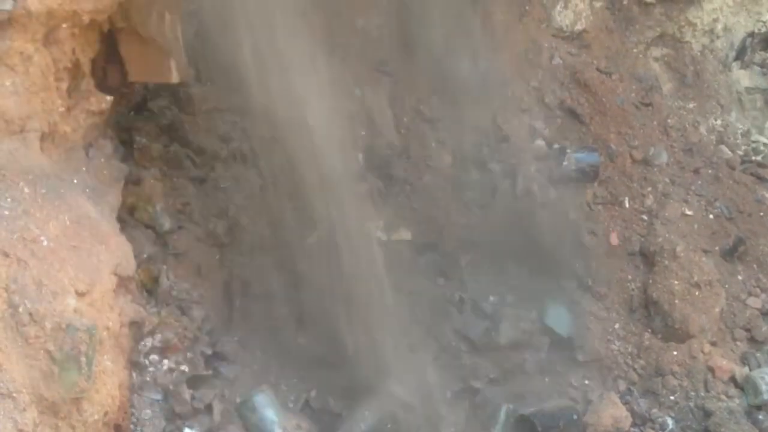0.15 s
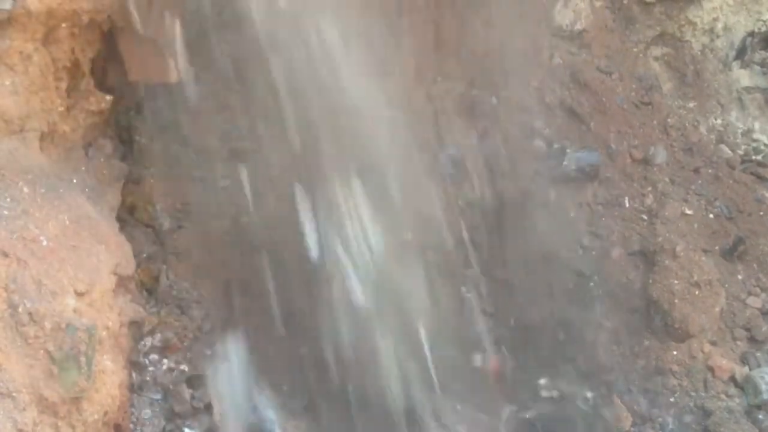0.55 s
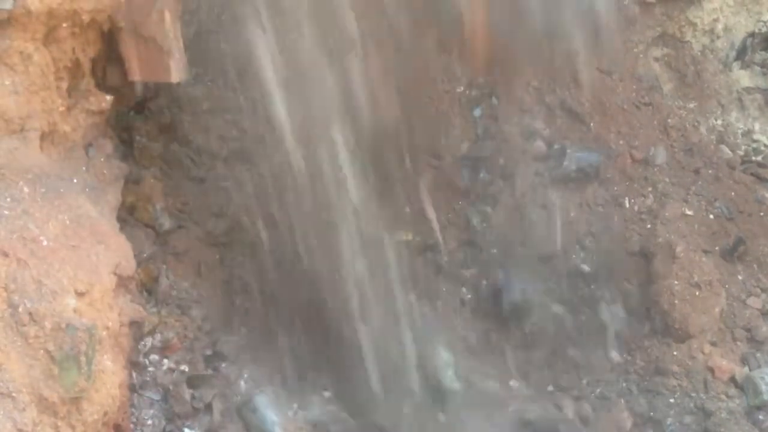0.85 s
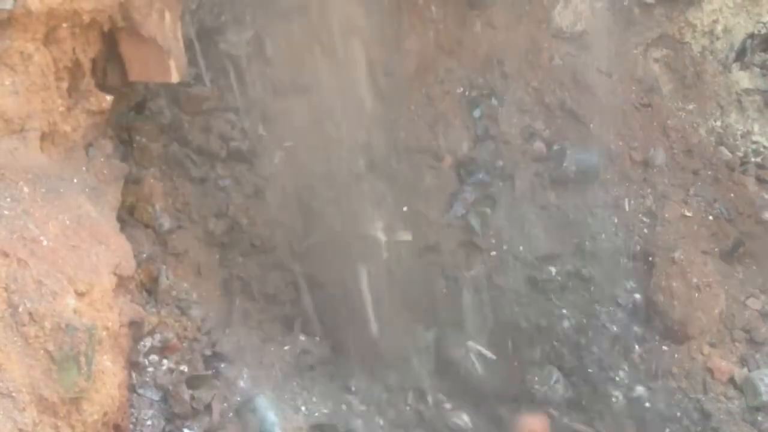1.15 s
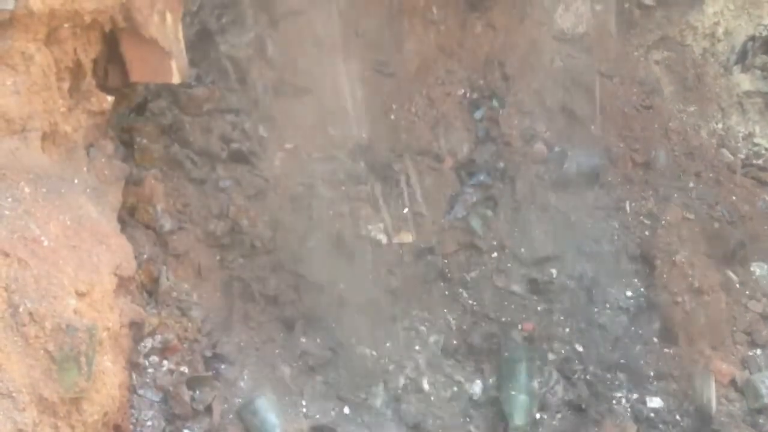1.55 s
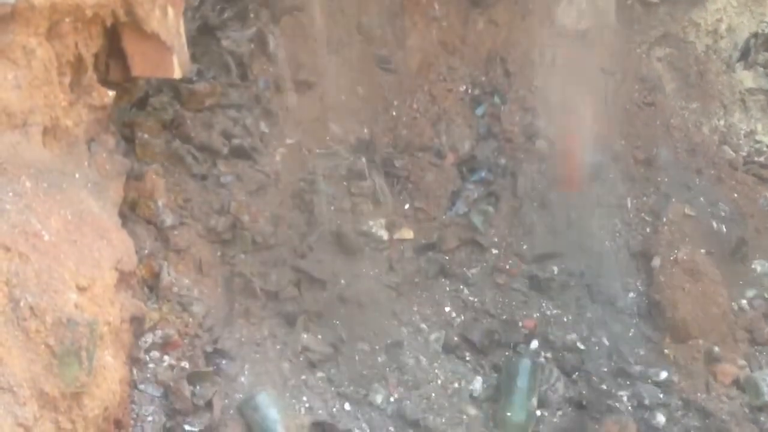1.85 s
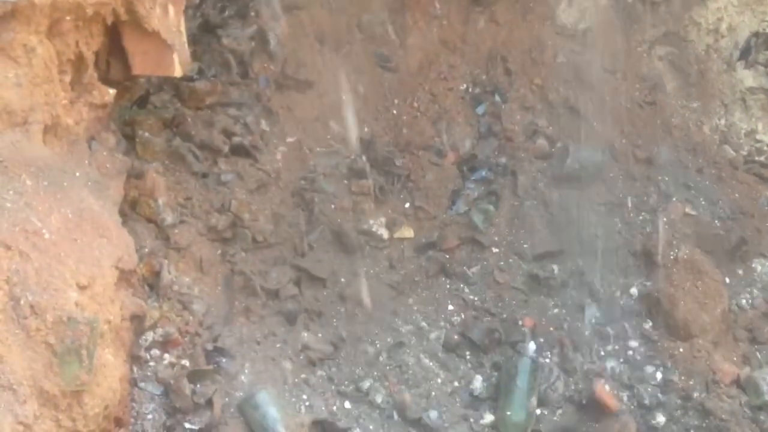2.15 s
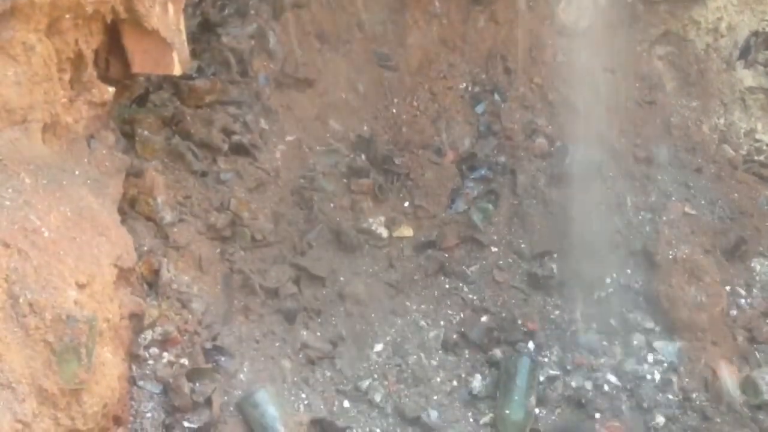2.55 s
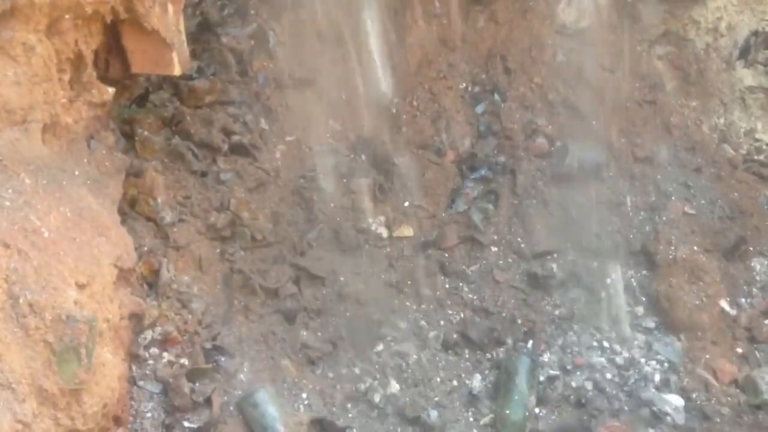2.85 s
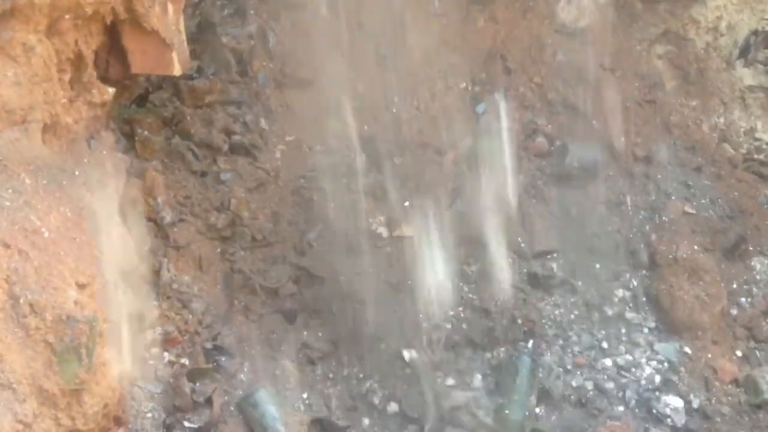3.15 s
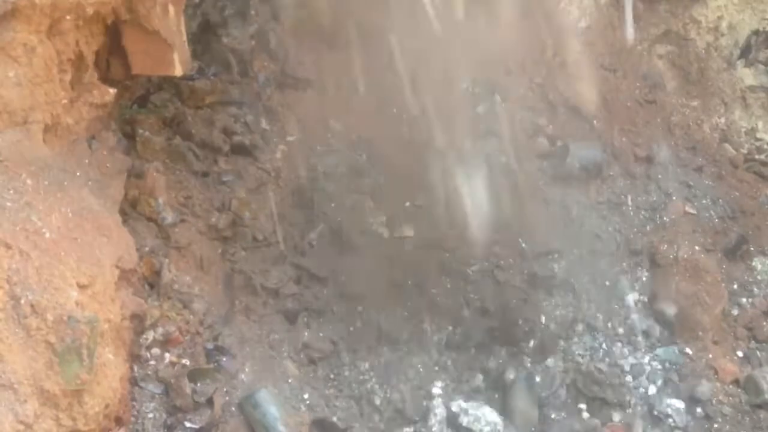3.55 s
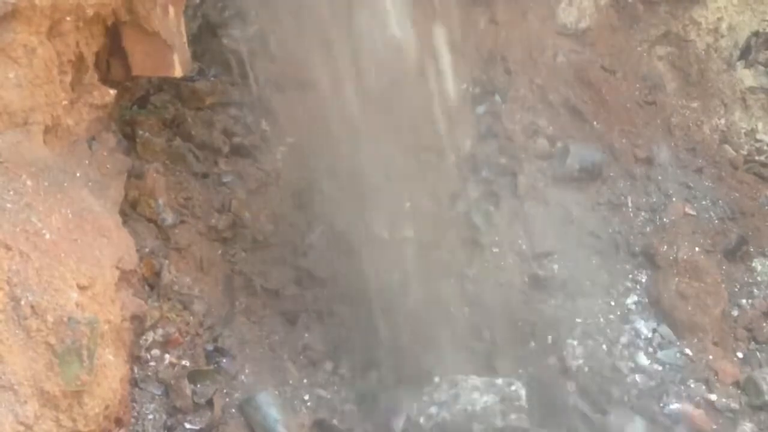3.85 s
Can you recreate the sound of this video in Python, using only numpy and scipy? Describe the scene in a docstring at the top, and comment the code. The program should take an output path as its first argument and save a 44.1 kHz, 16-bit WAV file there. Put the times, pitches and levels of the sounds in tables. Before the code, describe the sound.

Debris slides down a dirt face with bright glass clinks while an engine drones behind

```python
"""An earthen dig face: loose soil pours down, thins to a trickle and starts to build again.
The soil is many tiny noise bursts over hiss; stones and clods are larger bursts with short echoes.
Glass shards crack together and ring as fading pairs of tones, and hollow pieces give lower tones.
Behind, a digger's engine drones as a stack of tones with clatter; the drone drops abruptly at 2.5 s."""
import sys
import numpy as np
from scipy import signal
from scipy.fft import rfft, irfft
from scipy.io import wavfile

SR = 44100
rng = np.random.default_rng(int(sys.argv[2]) if len(sys.argv) > 2 else 0)


def store_wav(level_fs):
    """Save 16-bit WAV to argv[1]."""
    pcm = np.round(np.clip(np.atleast_2d(level_fs), -1, 1) * 32767)
    wavfile.write(sys.argv[1], SR, pcm.T.astype(np.int16))


N = 176400
T = np.arange(N) / SR

# Flow of the pouring soil: t/s, earth level/dB, gravel level/dB, sand level/dB
SOIL_FLOW = [(0, -24.5, -25, -25.5), (.1, -27.5, -26, -26.5), (.2, -34.5, -31.5, -33),
             (.3, -36.5, -38.5, -35.5), (.42, -31.5, -33.5, -31.5), (.55, -32, -26, -27.5),
             (.64, -41.5, -33.5, -27), (.73, -47.5, -44.5, -38.5), (.92, -39.5, -46.5, -35.5),
             (1.05, -49.5, -45.5, -34.5), (1.3, -47.5, -49.5, -41.5), (1.52, -48, -52.5, -44),
             (1.6, -43.5, -48, -44.5), (1.85, -47.5, -52, -45.5), (2.15, -41, -42, -45),
             (2.48, -54, -52, -42), (2.53, -55, -62, -50.5), (2.8, -53, -53, -47), (3.1, -46, -47, -41.5),
             (3.32, -45.5, -49.5, -45.5), (3.52, -50.5, -50.5, -48), (3.64, -42.5, -48.5, -43),
             (3.78, -39.5, -41.5, -39), (4, -45.5, -46, -40.5)]
HARD_RISE_S = 0.0002  # time constant of the sharp start of grains and cracks


def amp(db):
    """Turns decibels into a gain."""
    return 10 ** (np.asarray(db) / 20)


def unit(x):
    """Scales a sound to an rms level of 1."""
    return x / np.sqrt(np.mean(x ** 2) + 1e-20)


def curve(table):
    """Draws each column of a time table as a line through every sample."""
    seconds, *columns = np.transpose(table)
    return [np.interp(T, seconds, column) for column in columns]


def add(mix, start_s, sound):
    """Mixes a sound into a longer one from a given time."""
    part = mix[max(0, round(start_s * SR)):][:len(sound)]
    part += sound[:len(part)]


def colour(x, points, size=2048):
    """Shapes the spectrum with a filter of unit energy that never sounds ahead of its input."""
    hz, db = np.transpose(points)
    log_hz = np.log(abs(np.fft.fftfreq(size, 1 / SR)) + 1)
    log_gain = np.log(amp(np.interp(log_hz, np.log(hz), db)))
    # the Hilbert transform gives the phase that puts the energy as early as possible
    taps = np.fft.ifft(np.exp(np.conj(signal.hilbert(log_gain)))).real
    return signal.oaconvolve(x, taps / np.linalg.norm(taps))[:N]


def engine():
    """Exhaust tones follow the engine speed, with noisy clatter that throbs twice a cycle."""
    # engine speed: t/s, cycle rate/Hz
    speed = [(0, 14.7), (.5, 14.3), (.7, 14.7), (.9, 14.65), (1.27, 14.4), (1.45, 14.9), (1.75, 15.4),
             (1.95, 15.52), (2.45, 15.5), (2.8, 15.12), (3.15, 15.08), (3.55, 14.65), (3.75, 14.4),
             (4, 14.85)]
    # loudness of the drone: t/s, level/dB
    drone = [(0, -43), (.5, -38), (.8, -36), (1.3, -36), (1.8, -31), (2.49, -29.5), (2.505, -40.5),
             (3, -34.5), (3.4, -38), (4, -33)]
    # exhaust tones: multiple of the cycle rate, relative level/dB
    orders = [(9, -2.5), (10, -8.5), (11, -3.5), (12, 2.5), (14, -9), (15, -10), (20, -5.5), (24, -15.5),
              (25, -17.5), (31, -17.5), (35, -19.5), (40, -11)]
    # spectrum of the clatter: f/Hz, relative level/dB per Hz
    clatter_spectrum = [(20, 5), (85, -8), (140, 0.5), (260, -8), (330, 7), (420, -4), (620, -9),
                        (850, -10), (1200, -14.5), (2500, -22), (6000, -34), (16000, -25)]
    clatter_db, throb_depth, phase_scatter_rad = -11, 0.25, 1

    turn = 2 * np.pi * np.cumsum(curve(speed)[0]) / SR
    tones = np.zeros(N)
    for multiple, db in orders:
        phase = phase_scatter_rad * rng.standard_normal()
        tones += amp(db) * np.cos(multiple * turn + phase)
    throbbing = rng.standard_normal(N) * (1 + throb_depth * np.cos(2 * turn))
    clatter = unit(colour(throbbing, clatter_spectrum))
    return amp(curve(drone)[0]) * (unit(tones) + amp(clatter_db) * clatter)


def pit(x, size=8000):
    """The earth walls return a short, fading scatter of echoes."""
    echo_db, echo_t60_s, echoes_per_s, first_echo_s = -14.5, 0.05, 2000, 0.004
    t = np.arange(size) / SR
    present = (rng.random(size) < echoes_per_s / SR) * (t > first_echo_s)
    taps = rng.standard_normal(size) * present * amp(-60 * t / echo_t60_s)
    return x + amp(echo_db) * signal.oaconvolve(x, taps / np.linalg.norm(taps))[:N]


def flutter(hz, size):
    """Slowed-down noise makes the loudness unsteady, as a piece rattles on the soil."""
    depth = 0.4
    slow_noise = signal.lfilter(*signal.butter(1, hz, fs=SR), rng.standard_normal(size))
    return 1 + depth * unit(slow_noise)


def hollow(hz, db, t60, size=12000):
    """One low resonance swells and dies away unsteadily."""
    rise_s, rattle_hz = 0.0027, 60
    t = np.arange(size) / SR
    ring = flutter(rattle_hz, size) * np.sin(2 * np.pi * (hz * t + rng.random()))
    return ring * (1 - np.exp(-t / rise_s)) * amp(db - 60 * t / t60)


def clink(hz, db, over_hz, over_db, t60, size=9000):
    """A shard ticks on contact and rings in two modes, fluttering as it rattles on the soil."""
    rise_s, rattle_hz, tick_db, tick_t60_s = 0.00066, 252, -11, 0.028
    t = np.arange(size) / SR
    ring = np.zeros(size)
    for mode_hz, mode_db in [(hz, db), (over_hz, over_db)]:
        ring += amp(mode_db) * flutter(rattle_hz, size) * np.sin(2 * np.pi * mode_hz * t)
    # the tick is noise without its lows
    tick = signal.lfilter(*signal.butter(2, hz / 2, "high", fs=SR), rng.standard_normal(size))
    tick *= amp(db + tick_db - 60 * t / tick_t60_s)
    return tick + ring * (1 - np.exp(-t / rise_s)) * amp(-60 * t / t60)


def splinters(size=5000, count=4):
    """Bunches of glass bits tick and tinkle in the sand, crowded in the rush, rare in the trickle."""
    tries_per_s, bit_db, bit_t60_s = 45, -7, 0.05  # the bit level is relative to the sand
    extra_db, hop_s = 11, 0.012  # most added to a bit's level, and spacing of the bits
    lowest_hz, span_hz = 6370, 8000
    out, sand_db = np.zeros(N), curve(SOIL_FLOW)[2]
    for when, chance, *bits in rng.random((int(tries_per_s * N / SR), 2 + 4 * count)):
        flow_db = sand_db[int(when * N)]
        # a weaker flow lets fewer bunches through
        if chance ** 2 > amp(flow_db - sand_db.max()):
            continue
        for k, (hop, pitch, overtone, weight) in enumerate(np.reshape(bits, (count, -1))):
            level = flow_db + bit_db + extra_db * weight ** 3
            low_hz, high_hz = lowest_hz + span_hz * np.sort([pitch ** 2, overtone])
            bit = clink(low_hz, level, high_hz, level - 2.5, bit_t60_s, size=size)
            add(out, when * N / SR + hop_s * (k + hop), bit)
    return out


def blow(db, hz, octaves, t60, rise_s, size=6000):
    """A short burst of noise around a centre pitch stands for many brief resonances."""
    t, f = np.arange(size) / SR, np.fft.rfftfreq(size, 1 / SR) + 1
    # a hump on the pitch scale, leaning towards the lows
    shape = np.exp(-.5 * (np.log2(f / hz) / octaves) ** 2) / np.sqrt(1 + f / hz)
    body = unit(irfft(rfft(rng.standard_normal(size)) * shape))
    return .5 * body * (1 - np.exp(-t / rise_s)) * amp(db - 60 * t / t60)


def clod(db, hz, t60, size=9000):
    """A soft thud sets the heap ringing, a little differently each time."""
    # hollow ring of the heap: f/Hz before detuning, level/dB relative to the clod, t60/s
    heap = [(281, -9, 0.063), (546, -6, 0.059), (796, -13, 0.081), (1216, -15.5, 0.16), (1583, -32, 0.26)]
    width_octaves, rise_s, detune = 1, 0.0012, 0.03
    ring = np.zeros(size)
    for mode_hz, mode_db, decay_s in heap:
        detuned_hz = mode_hz * (1 + detune * rng.uniform(-0.85, 1))
        ring += hollow(detuned_hz, db + mode_db, decay_s, size=size)
    return blow(db, hz, width_octaves, t60, rise_s, size=size) + .5 * ring


def crack(db, hz, octaves, t60):
    """A hard piece strikes and at once strikes again, more softly, as it tips over."""
    rebound_s, rebound_db = 0.0031, -5
    sound = blow(db, hz, octaves, t60, HARD_RISE_S)
    add(sound, rebound_s, blow(db + rebound_db, hz, octaves, t60, HARD_RISE_S))
    return sound


def grains(rate, hz, spread_db, t60, wash_db, count=24):
    """Many small impacts at random times, of varied size and pitch, over a wash of finer dust."""
    width_octaves, scatter_octaves = 0.48, 1.324  # width of one grain, reach of the pitches each way
    sizes = amp(spread_db * np.minimum(rng.exponential(1, N), 3))
    hits = (rng.random(N) < rate / SR) * sizes
    kind = rng.integers(0, count, N)
    pitches = hz * 2 ** (scatter_octaves * np.linspace(-1, 1, count))
    out = np.zeros(N)
    for k, pitch in enumerate(pitches):
        grain = blow(0, pitch, width_octaves, t60, HARD_RISE_S, size=2048)
        out += signal.oaconvolve(hits * (kind == k), grain)[:N]
    return unit(out) + amp(wash_db) * rng.standard_normal(N)


def soil():
    """Earth thuds, gravel rattles and sand hisses as the flow swells and thins."""
    # filters for the three kinds of grain: f/Hz, relative level/dB
    earth_spectrum = [(20, -28), (90, -36), (150, 3), (260, -0.5), (400, -2.5), (660, 3), (830, -9.5),
                      (1000, -11.5), (2000, -26), (16000, -36)]
    gravel_spectrum = [(20, -59), (300, -47), (800, -1.5), (1300, -0.5), (1900, -3.5), (3100, 2),
                       (4400, -1), (7000, -19), (16000, -48)]
    sand_spectrum = [(20, -54), (1500, -14), (3800, -3), (5200, -2.5), (6700, 2.5), (8500, 1),
                     (11000, -5.5), (13000, 2), (15200, -4.5), (16000, -15)]
    earth_db, gravel_db, sand_db = curve(SOIL_FLOW)
    # rate is in impacts per second
    earth = grains(rate=350, hz=461, spread_db=3.5, t60=0.065, wash_db=-1.0)
    gravel = grains(rate=550, hz=2210, spread_db=4.5, t60=0.028, wash_db=-3)
    sand = grains(rate=700, hz=7500, spread_db=5.5, t60=0.017, wash_db=-3)
    return (amp(earth_db) * unit(colour(earth, earth_spectrum))
            + amp(gravel_db) * unit(colour(gravel, gravel_spectrum))
            + amp(sand_db) * unit(colour(sand, sand_spectrum)))


def scene():
    """Soil, glass and stones sound in the pit, with the engine behind."""
    # ringing shards: t/s, f/Hz, level/dB, overtone f/Hz, overtone level/dB, t60/s
    shards = [(0.113, 10228, -21, 6700, -35, 0.093), (.127, 6960, -20.5, 11700, -25, 0.25),
              (0.411, 7360, -22.5, 10430, -24, 0.3), (0.414, 7700, -23, 10300, -26, 0.12),
              (.443, 7230, -13, 12900, -16, 0.064), (0.445, 8500, -22, 6270, -23, 0.063),
              (.526, 5975, -14.5, 12900, -29, 0.08), (0.593, 8500, -23, 14900, -25, 0.093),
              (0.621, 6330, -8.5, 10800, -21, 0.05), (0.65, 6740, -5.5, 8600, -28, 0.053),
              (0.761, 6720, -15, 13340, -20.5, 0.089), (0.764, 7090, -21.5, 13100, -35, 0.21),
              (0.999, 10706, -18.5, 13200, -25, 0.12), (1.003, 6330, -19.5, 14600, -29, 0.1),
              (1.037, 6620, -13.5, 12860, -16, 0.045), (1.043, 6470, -17, 7180, -18, 0.056),
              (1.136, 6310, -12, 14000, -11, 0.03), (1.2209, 5420, -11, 6400, -28, 0.02),
              (1.285, 11300, -24, 7300, -26, 0.019), (1.631, 10664, -31.5, 14438, -35, 0.055),
              (1.952, 8730, -13.5, 13000, -25, 0.098), (2.06, 9400, -27.5, 13065, -30, 0.076),
              (2.287, 9290, -17.5, 13400, -24, 0.1), (2.403, 5490, -22, 8000, -34, 0.095),
              (2.423, 8000, -19.5, 12000, -26, 0.13), (2.471, 8100, -19, 13000, -16, 0.049),
              (2.521, 8060, -32.5, 12295, -36, 0.12), (2.656, 8700, -35, 8000, -40, 0.13),
              (2.952, 8400, -19, 12300, -38, 0.029), (3.037, 6390, -21, 10670, -30, 0.067),
              (3.1236, 8327, -23, 12478, -26, 0.046), (3.434, 5465, -18.5, 9576, -36, 0.058)]
    # sharp blows of stone and glass: t/s, relative level/dB, centre f/Hz, width/octaves, t60/s
    sharp_blows = [(.007, -16.5, 3470, 0.14, 0.17), (0.1645, -6, 2200, 1.6, 0.058),
                   (.204, -20, 4210, 0.27, 0.024), (.222, -11.5, 5650, 0.75, 0.028),
                   (.36, -6.5, 3500, 1.3, 0.032), (0.464, -11, 2570, 1.8, 0.048),
                   (0.4757, -9, 4000, 1.8, .007), (0.5092, -9, 2820, 0.44, 0.049),
                   (0.5623, -3.5, 3840, 0.34, 0.009), (0.593, -10.5, 10000, .7, 0.028),
                   (0.6214, -12, 4500, 4.5, 0.022), (0.659, -7.5, 6000, 2, 0.01),
                   (0.7057, -14, 7500, 0.63, 0.016), (0.762, -20, 9050, .7, 0.012),
                   (0.8059, -12.5, 5970, 0.87, 0.021), (1.039, -13.5, 4000, 2.5, 0.068),
                   (1.1366, -10.5, 4550, 2.2, 0.012), (1.1983, -12, 2900, 1.13, 0.017),
                   (1.342, -23.5, 3000, 1.3, 0.024), (1.57, -23.5, 5540, 0.83, 0.055),
                   (1.59, -22, 4170, 2.7, 0.075), (1.722, -23.5, 4500, 1.14, 0.047),
                   (2.0075, 0.5, 8600, 1.1, 0.011), (2.044, -19, 5360, 0.6, 0.018),
                   (2.108, -20.5, 2840, 0.35, 0.061), (2.171, -23.5, 5930, 0.77, 0.038),
                   (2.297, -24, 1290, 0.63, 0.025), (2.421, -7, 9100, 1.24, 0.024),
                   (2.4923, -5, 6040, 1.1, 0.0091), (2.8992, -10, 9100, 1.03, 0.013),
                   (2.953, -16.5, 9400, 1.6, .015), (2.998, -23, 2170, 0.5, 0.051),
                   (3.1796, -2, 5400, 0.61, 0.016), (3.1792, -9.5, 13300, 0.1, 0.019),
                   (3.2233, -18, 9000, 0.82, 0.014), (3.246, -24.5, 3140, 0.94, 0.22),
                   (3.27, -11.5, 2590, 1.4, 0.017), (3.304, -19, 2380, 1.18, 0.092),
                   (3.568, -4.5, 2750, 0.77, 0.013), (3.764, -16, 5060, 2.4, 0.02),
                   (3.851, -17, 6600, 1, 0.027), (3.871, -23, 2200, 1.2, 0.022),
                   (3.9426, -14, 8500, 1.3, 0.012), (3.978, -22, 6400, 0.61, 0.031)]
    # hollow bottle pieces knocked by the soil: t/s, f/Hz, level/dB, t60/s
    hollow_pieces = [(.1, 1227, -26, 0.22), (.138, 798, -19.5, 0.21), (.272, 650, -28, 0.18),
                     (.533, 667, -17, 0.17), (.563, 652, -12, 0.05), (0.661, 1234, -17.5, 0.037),
                     (3.31, 1583, -39, 0.35), (3.316, 294, -25, 0.074)]
    # clods landing: t/s, relative level/dB, centre f/Hz, t60/s
    landings = [(0.069, -10, 300, 0.035), (.087, -8, 600, 0.024), (.101, -7.5, 640, 0.036),
                (.166, -22, 1100, 0.03), (.443, -17, 711, .04), (0.926, -29, 546, 0.038),
                (2.102, -20.5, 1170, 0.089), (3.262, -9.5, 740, 0.035), (3.307, -23.5, 795, 0.08),
                (3.569, -23, 1000, 0.05), (3.781, -19.5, 1490, 0.046)]

    debris = soil()
    for start_s, *shard in shards:
        add(debris, start_s, clink(*shard))
    for start_s, *strike in sharp_blows:
        add(debris, start_s, crack(*strike))
    for start_s, *piece in hollow_pieces:
        add(debris, start_s, hollow(*piece))
    for start_s, *landing in landings:
        add(debris, start_s, clod(*landing))
    return (engine() + pit(debris) + splinters())[None]


def record(dry):
    """The recorder thins the deep bass and cuts off the highest treble."""
    low_cut_hz, edge_hz = 83, 15300
    thinned = signal.lfilter(*signal.butter(2, low_cut_hz, "high", fs=SR), dry)
    treble_cut = signal.firwin(301, edge_hz, window=("kaiser", 8), fs=SR)
    return signal.oaconvolve(thinned, treble_cut[None], "same")


dry = scene()
out = record(dry)
store_wav(out)
```